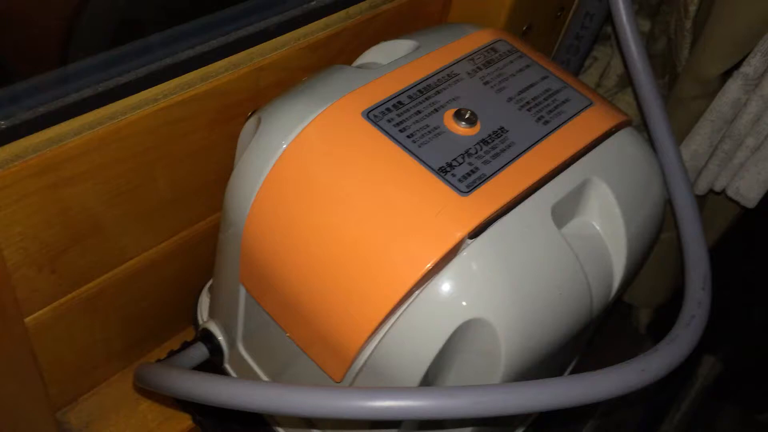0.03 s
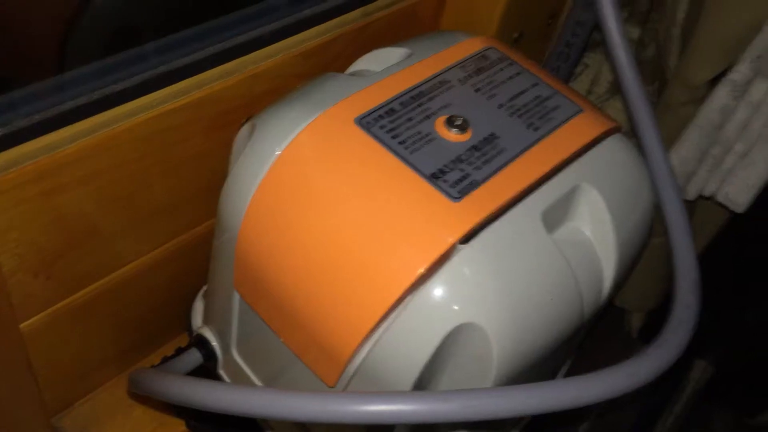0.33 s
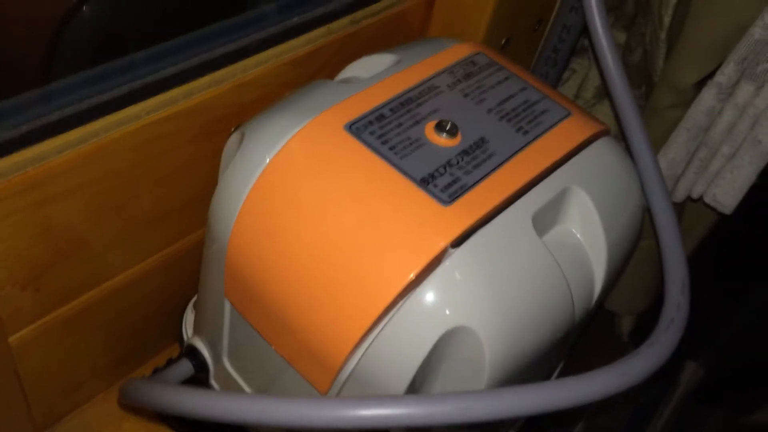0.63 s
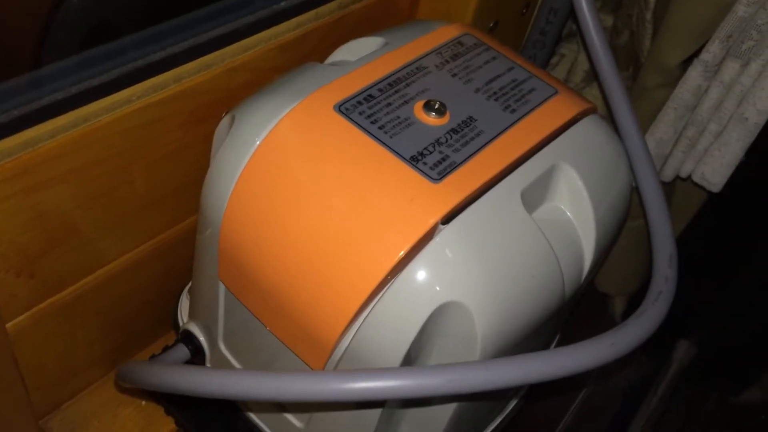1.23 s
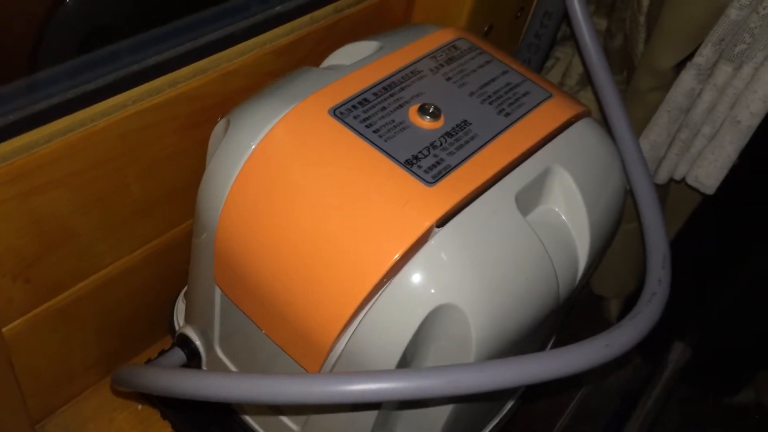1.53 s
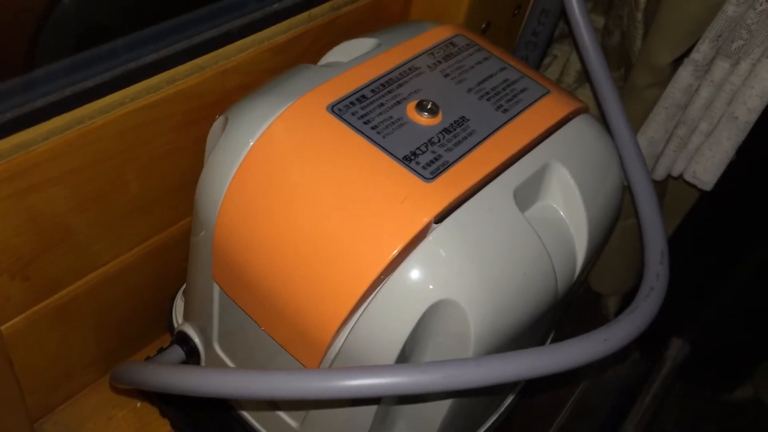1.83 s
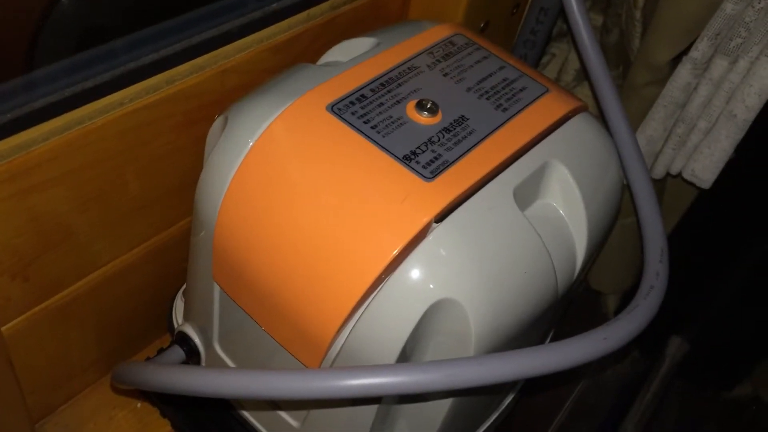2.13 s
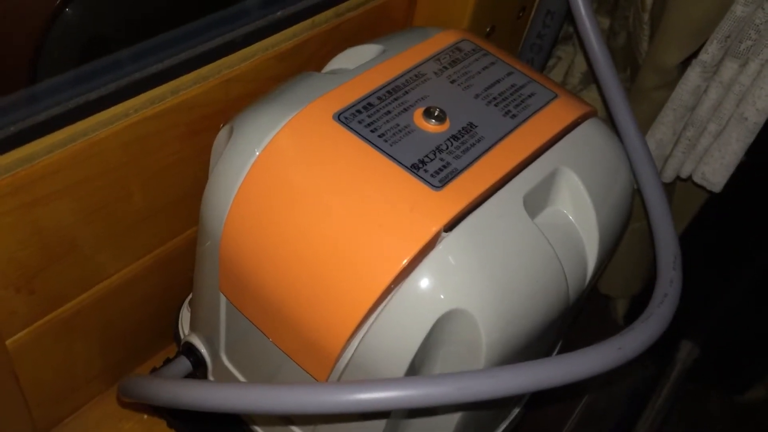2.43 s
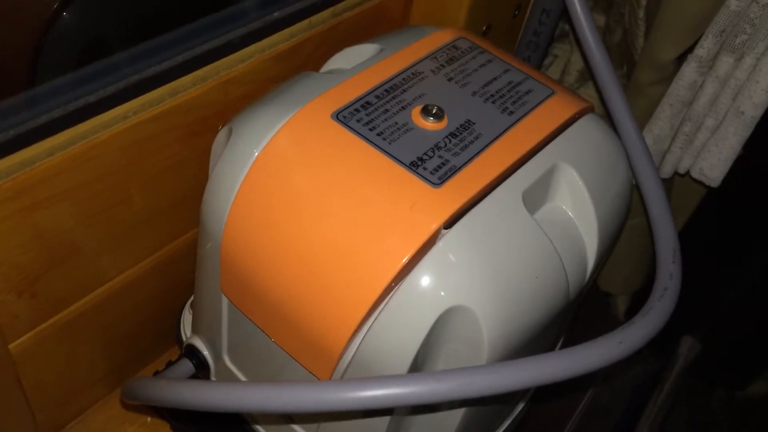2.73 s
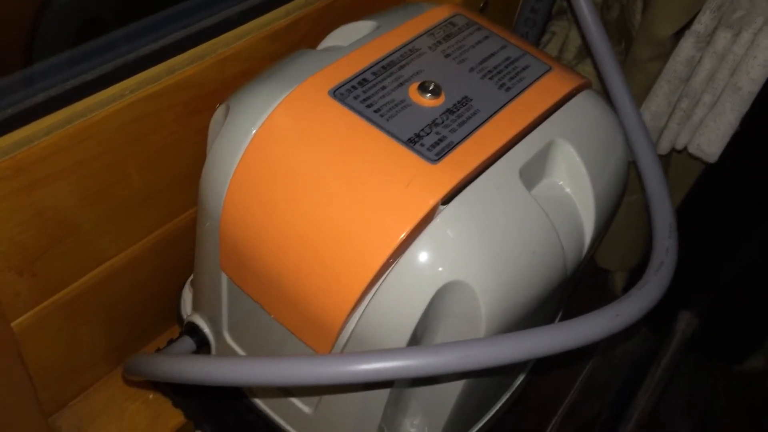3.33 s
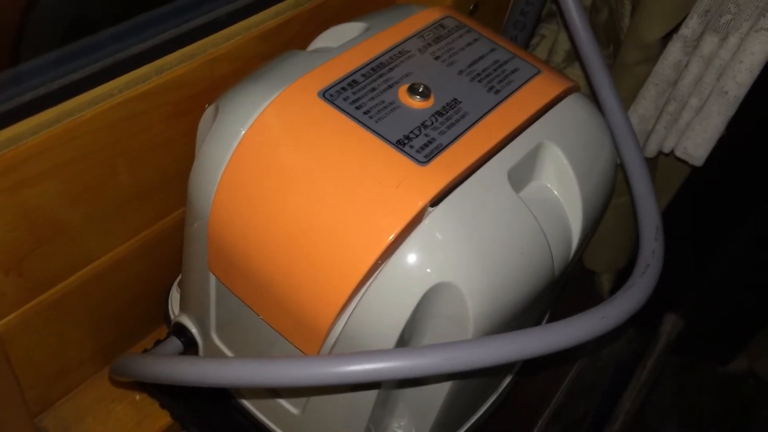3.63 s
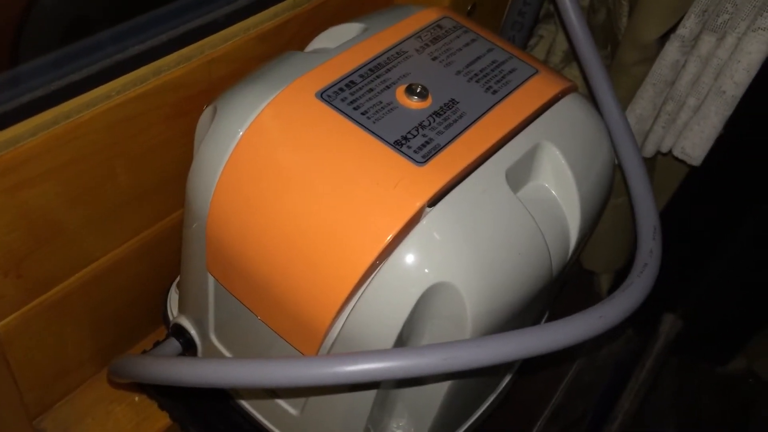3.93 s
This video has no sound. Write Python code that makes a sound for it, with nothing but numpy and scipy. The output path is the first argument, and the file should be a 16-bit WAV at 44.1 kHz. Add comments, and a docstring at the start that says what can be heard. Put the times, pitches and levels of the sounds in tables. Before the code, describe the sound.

An electric air pump runs steadily close by in a room, with a low hum, buzzing valves and a light hiss. Behind it are a low rumble, dull burbles and a muffled engine that idles, then speeds up slightly.

```python
"""A mains-driven diaphragm air pump comes in almost at once, close by on a wooden shelf indoors, and runs
steadily: its armature hums, its valves buzz and air hisses through the ringing housing. Behind it,
over a low room rumble and dull burbles, what seems to be an engine outside idles, muffled by the walls.
The idle sags until just past two seconds; then the engine speeds up a little to the end."""
import sys
import numpy as np
from scipy import signal
from scipy.fft import rfft, irfft, next_fast_len
from scipy.io import wavfile
from scipy.ndimage import uniform_filter1d, map_coordinates

SR = 44100
rng = np.random.default_rng(int(sys.argv[2]) if len(sys.argv) > 2 else 0)


def dump_mix(stems):
    """Bounce the given channels to the path in sys.argv[1] as a 16-bit WAV at rate SR."""
    frames = np.atleast_2d(stems).T  # one column per channel
    limited = np.clip(frames, -1, 1)  # hard clip at full scale
    pcm = np.round(limited * 32767).astype(np.int16)
    wavfile.write(sys.argv[1], SR, pcm)


N = 176400
MAINS_HZ = 50.02

# The colour of air passing the valves. Each row: frequency in Hz, relative level in dB.
AIR_SPECTRUM = [(150, 4.5), (400, 0), (560, 0), (850, -1), (1020, -1), (1380, -4.5), (1520, -18),
                (1750, -1), (2050, -3), (2550, 0.5), (3200, -9.5), (4000, -8.5), (4850, -15), (5200, -6),
                (6400, -9.5), (7300, -11.5), (9200, -13.5), (10400, -21), (11500, -16.5), (12900, -20.5),
                (14500, -16), (15200, -23)]


def hum():
    """The swinging armature thumps the case: low multiples of the mains rate that crest together."""
    # The hum's partials. Each row: multiple of the mains rate, level in dB.
    partials = [(1, -57.5), (2, -47), (3, -53), (4, -51), (6, -68.5), (14, -74.5)]
    waver_db = 0.8
    phase = 2 * np.pi * strokes()
    return sum(amp(db) * unit(amp(waver_db * wobble(4.92)) * np.cos(k * phase)) for k, db in partials)


def valve_buzz():
    """The valves slap on every stroke: a comb of partials, a few of them strong."""
    # The strong partials. Each row: multiple of the mains rate, level in dB.
    partials = [(22, -76.5), (23, -59.5), (24, -72), (26, -64.5), (27, -80.5), (29, -77.5), (32, -77),
                (33, -68.5), (34, -72), (36, -78), (38, -74), (41, -77), (45, -74), (48, -76), (49, -70.5),
                (52, -88), (53, -78), (54, -76.5), (55, -78)]
    strong = sum(amp(db) * partial(k * strokes(), waver_db=1.5, drift_rad=0.33, rate=6.69)
                 for k, db in partials)
    # The faint comb is one cycle in the colour of the air, looped once a stroke.
    orders = np.arange(20, 60)
    comb = np.zeros(2048, complex)
    phases = 2 * np.pi * rng.random(len(orders))
    comb[orders] = amp(along(AIR_SPECTRUM, orders * MAINS_HZ)) * np.exp(1j * phases)
    cycle = irfft(comb)
    faint = np.interp(strokes(), np.arange(len(cycle)) / len(cycle), cycle, period=1)
    return strong + amp(-77) * unit(faint)


def air_hiss():
    """Air rushes through the valves, its treble finely coloured by nearby walls."""
    walls_db = 4.5 * rng.uniform(-2, 2, 512)
    ripple_db = lambda hz: map_coordinates(walls_db, [hz / 70], mode="mirror") * np.minimum(hz / 5000, 1)
    air = unit(filtered(puffs(), lambda hz: amp(along(AIR_SPECTRUM, hz) + ripple_db(hz))))
    return amp(-58.5 + 0.45 * wobble(13)) * air


def housing_rattle():
    """Each uneven stroke rattles the housing: a steady ring, and a rasp that swells and fades."""
    # The housing's resonances. Each row: centre in Hz, width in Hz, level in dB.
    modes = [(1157, 41, -65.5), (1280, 86, -62.5), (1639, 48, -68), (2663, 78, -77), (3523, 29, -76),
             (4369, 65, -71.5), (6220, 52, -74.5), (12230, 310, -74.5)]
    # The two rasping resonances. Each row: centre in Hz, width in Hz.
    rasp_modes = [(2205, 56), (2435, 51)]
    # Their swells. Each row: time in seconds, level of the lower in dB, level of the upper in dB.
    rasp_levels = [(0, -66.5, -63), (.6, -61, -60.5), (1, -69, -69), (1.7, -67.5, -60), (2.14, -68, -73),
                   (2.36, -75, -59.5), (2.55, -69.5, -69.5), (3.4, -64, -71.5), (4, -63, -65.5)]
    chatter_db, uneven_db, waver_db = 3.5, 1.0, 1.1
    rattle = amp(chatter_db * np.cos(2 * np.pi * strokes()) + uneven_db * wobble(MAINS_HZ))
    ring = sum(amp(db + waver_db * wobble(5.59)) * ringing(rattle * puffs(), hz, width)
               for hz, width, db in modes)
    rasp = sum(amp(db) * ringing(rattle * puffs(), hz, width)
               for (hz, width), db in zip(rasp_modes, curves(rasp_levels)))
    return ring + rasp


def valve_whistle():
    """Air in the valves sings a thin whistle that comes and goes."""
    # The whistle's swells. Each row: time in seconds, level in dB.
    levels = [(0, -69), (.4, -66.5), (.55, -68.5), (.8, -69), (.9, -63.5), (1.05, -72), (1.4, -70),
              (1.6, -78), (1.95, -77), (2.1, -66.5), (2.4, -72.5), (2.7, -71), (3.05, -67), (3.55, -69.5),
              (3.9, -64.5)]
    return amp(curves(levels)[0]) * ringing(puffs(), centre_hz=5472, width_hz=107)


def engine_drone():
    """Muffled firing harmonics follow the engine's speed; three boom in the room, beating with the hum."""
    # The engine's run. Each row: time in seconds, firing rate in Hz, level in dB before the walls.
    run = [(0, 40.32, -42.5), (1.0, 38.49, -61), (1.3, 38.1, -54), (1.55, 37.42, -50), (1.95, 37.57, -47),
           (2.15, 36.79, -49), (2.4, 38.07, -55), (2.6, 40.26, -45.5), (2.85, 41.82, -45),
           (3.1, 41.95, -50.5), (3.5, 42.75, -45.5), (4, 43.35, -45.5)]
    # What walls and room do to the weaker harmonics. Each row: frequency in Hz, gain in dB.
    wall_gain = [(36, -16), (43, -24), (112, -6), (122, -17.5), (128, -9.5), (187, -18), (200, -13),
                 (210, -12), (225, -15.5), (250, -16.5), (262, -16.5)]
    # The room boom. Each row: time in seconds, then the levels of harmonics 2, 4 and 7 in dB.
    boom_levels = [(0, -62, -75, -88), (1.1, -60, -54.5, -90), (1.3, -62, -56, -59), (1.6, -54, -50, -52.5),
                   (1.87, -53, -52, -58), (2.15, -61, -53, -56), (2.35, -48, -55.5, -69),
                   (2.53, -59, -45, -81), (2.72, -49, -56.5, -62), (2.95, -51, -47, -57.5),
                   (3.15, -48, -52.5, -70), (3.4, -44, -56, -69), (3.65, -51, -49, -73),
                   (3.87, -50, -56, -72), (4, -51, -57, -78)]
    firing_hz, level_db = curves(run)
    turns = np.cumsum(firing_hz) / SR + 0.012 * wobble(9)  # slightly uneven firing
    harmonic = lambda k, waver_db: partial(k * turns, waver_db, drift_rad=0.12, rate=7.3)
    muffled = sum(amp(along(wall_gain, k * firing_hz)) * harmonic(k, waver_db=4) for k in (1, 3, 5, 6))
    boom = sum(amp(db) * harmonic(k, waver_db=0.8) for k, db in zip((2, 4, 7), curves(boom_levels)))
    return amp(level_db) * muffled + boom


def burbling_roar():
    """A rough, burbling midrange: patchy noise that grows a little louder towards the end."""
    # The roar's colour. Each row: frequency in Hz, relative level in dB.
    spectrum = [(150, -24), (330, 9.5), (470, 5), (570, -5), (660, 9.5), (740, -7.5), (850, 7.5),
                (1100, -12.5), (1500, -9), (2500, -24), (6000, -79)]
    # The roar's swells. Each row: time in seconds, level in dB.
    levels = [(0, -67), (1.1, -69), (1.35, -65.5), (1.6, -63), (2.3, -67), (2.6, -62.5), (3.0, -61.5),
              (3.3, -61.5), (3.6, -64), (4, -62.5)]
    return amp(curves(levels)[0]) * patchy(noise(spectrum), depth_db=5)


def burbles():
    """Short, hollow swells of narrow noise in the background."""
    # Each row: crest time in seconds, centre in Hz, width in Hz, half-length in seconds, crest in dB.
    swells = [(0.337, 700, 90, 0.037, -64), (0.555, 665, 70, 0.034, -64), (0.633, 480, 120, 0.037, -61),
              (.655, 650, 70, .04, -61), (0.76, 407, 200, 0.019, -59), (0.905, 700, 70, .05, -62.5),
              (1.076, 675, 50, .025, -59), (1.264, 686, 60, 0.0099, -60), (1.345, 376, 89.5, 0.031, -56),
              (1.377, 790, 110, 0.041, -66), (1.42, 676, 70, 0.018, -60.5), (1.9, 690, 70, .025, -59.5),
              (1.933, 400, 180, 0.037, -57.5), (2.21, 397, 150, .04, -60.5),
              (2.555, 450, 110, 0.035, -59.5), (2.903, 434, 150.4, 0.042, -59),
              (2.918, 670, 50, .025, -62.5), (3.058, 457, 130, 0.046, -58), (3.061, 945, 60.54, .03, -63),
              (3.17, 790, 60, 0.014, -58.5), (3.225, 489.3, 40, 0.037, -57), (3.312, 474, 40, 0.027, -55),
              (3.32, 800, 60, 0.048, -60), (3.401, 364, 100, 0.022, -59.5), (3.612, 845.6, 60, 0.035, -60),
              (3.69, 478.7, 49.9, 0.021, -60), (3.775, 463.3, 40, .03, -58), (3.923, 680, 80, 0.018, -61),
              (3.945, 388, 40, 0.029, -58)]
    t, out = np.arange(N) / SR, np.zeros(N)
    for crest_s, hz, width, half_s, db in swells:
        swell = np.exp(-((t - crest_s) / half_s) ** 2)
        burble = unit(swell * ringing(rng.standard_normal(N), hz, width))
        out += amp(db) * np.sqrt(np.mean(swell ** 2)) * burble
    return out


def room_rumble():
    """Low noise that fills the room."""
    # The rumble's colour. Each row: frequency in Hz, relative level in dB.
    spectrum = [(15, -2.5), (32, -35), (48, 6), (62, 7), (80, 6), (105, 6.5), (125, 7), (165, 5), (215, 3),
                (250, -5), (310, -9), (380, -18), (450, -33), (800, -25.5), (2000, -60)]
    # Its rise and fall. Each row: time in seconds, level in dB.
    levels = [(0, -51), (.35, -48.5), (1.1, -53), (1.6, -52), (2.2, -48), (2.45, -50.5), (2.75, -49.5),
              (3.1, -50.5), (4, -54)]
    return amp(curves(levels)[0]) * noise(spectrum)


def strokes():
    """Strokes of the armature counted since the start."""
    return MAINS_HZ * np.arange(N) / SR


def puffs():
    """Turbulent air, swelling twice a stroke."""
    return rng.standard_normal(N) * (1 + 0.12 * np.sin(2 * np.pi * 2 * strokes()))


def amp(db):
    """Decibels to gain."""
    return 10 ** (np.asarray(db) / 20)


def unit(x):
    """x scaled to rms 1."""
    return x / np.sqrt(np.mean(x ** 2) + 1e-20)


def along(points, hz):
    """The value at hz between (Hz, value) points on a log axis."""
    freqs, values = np.transpose(points)
    return np.interp(np.log(hz + 1), np.log(freqs + 1), values)


def curves(rows):
    """One value per sample for each column after the time."""
    times, *columns = np.transpose(rows)
    return [np.interp(np.arange(N) / SR, times, column) for column in columns]


def wobble(rate):
    """A smooth random curve, rate knots a second."""
    return map_coordinates(rng.standard_normal(512), [np.arange(N) * rate / SR], mode="mirror")


def filtered(x, response):
    """x shaped by a gain that depends on frequency."""
    size = next_fast_len(N + SR // 2)
    return irfft(rfft(x, size) * response(np.fft.rfftfreq(size, 1 / SR)), size)[:N]


def noise(spectrum):
    """Coloured noise of rms 1."""
    return unit(filtered(rng.standard_normal(N), lambda hz: amp(along(spectrum, hz))))


def partial(turns, waver_db, drift_rad, rate):
    """A sine of rms 1 that wavers in level and phase."""
    phase = 2 * np.pi * (turns + rng.random()) + drift_rad * wobble(rate)
    return unit(amp(waver_db * wobble(rate)) * np.sin(phase))


def patchy(x, depth_db, size=1024):
    """x with random gains over short patches of time and pitch, at rms 1."""
    frames = signal.stft(x, nperseg=size)[2]
    patches = uniform_filter1d(rng.standard_normal(frames.shape), size=3, axis=0)
    patches = uniform_filter1d(patches, size=5, axis=1)
    return unit(signal.istft(frames * amp(depth_db * unit(patches)), nperseg=size)[1][:N])


def ringing(x, centre_hz, width_hz):
    """x through one resonance with steep skirts, at rms 1."""
    peak = lambda hz: 1j * hz * width_hz / (centre_hz ** 2 - hz ** 2 + 1j * hz * width_hz)
    return unit(filtered(x, lambda hz: peak(hz) * np.exp(-((hz - centre_hz) / (3 * width_hz)) ** 2)))


def scene():
    """The pump in front; the engine, the burbles and the rumble behind."""
    pump = hum() + valve_buzz() + air_hiss() + housing_rattle() + valve_whistle()
    return (pump + engine_drone() + burbling_roar() + burbles() + room_rumble())[None]


def record(dry):
    """The sound cuts in after a moment of silence, with the very top of the treble removed."""
    start_s, fade_s, top_hz = 0.07, 0.0015, 15330
    fade_in = np.clip((np.arange(N) / SR - start_s) / fade_s, 0, 1)
    return filtered(dry[0] * fade_in, lambda hz: hz < top_hz)[None]


dry = scene()
out = record(dry)
dump_mix(out)
```